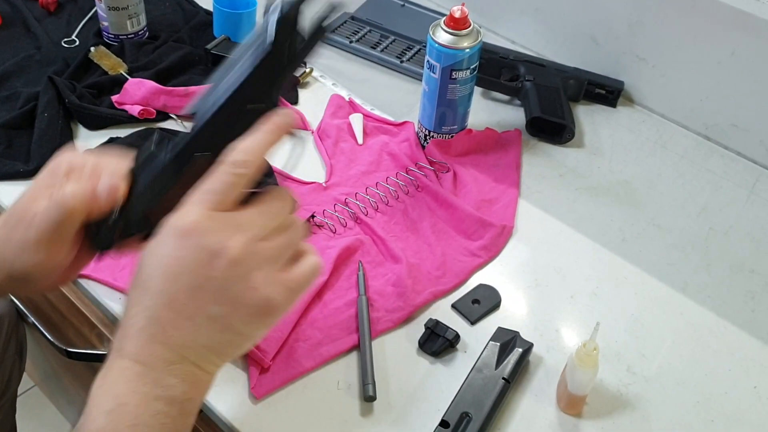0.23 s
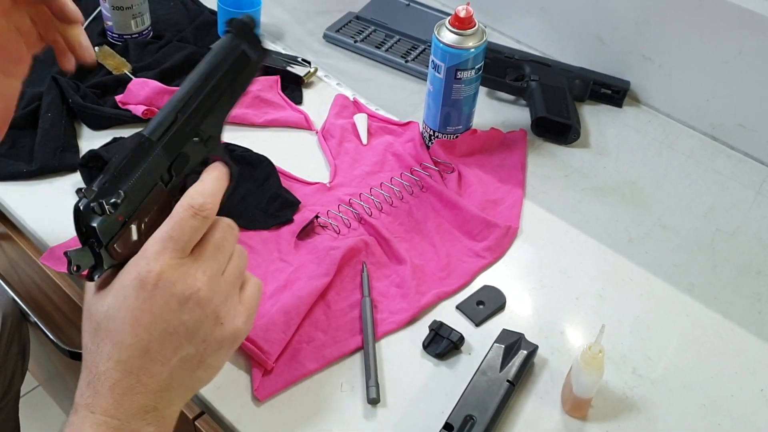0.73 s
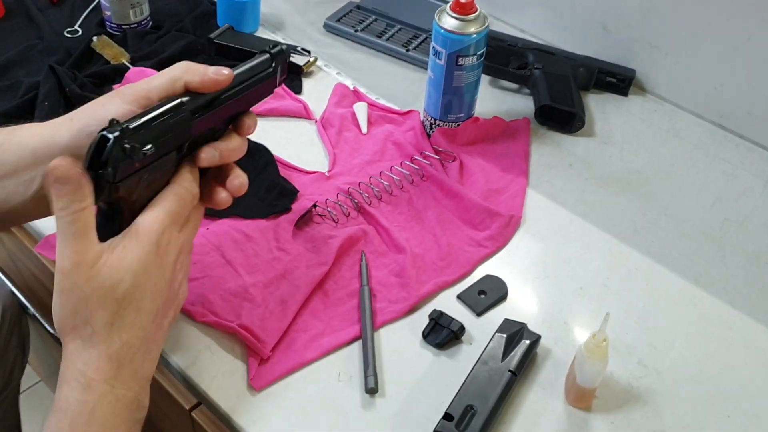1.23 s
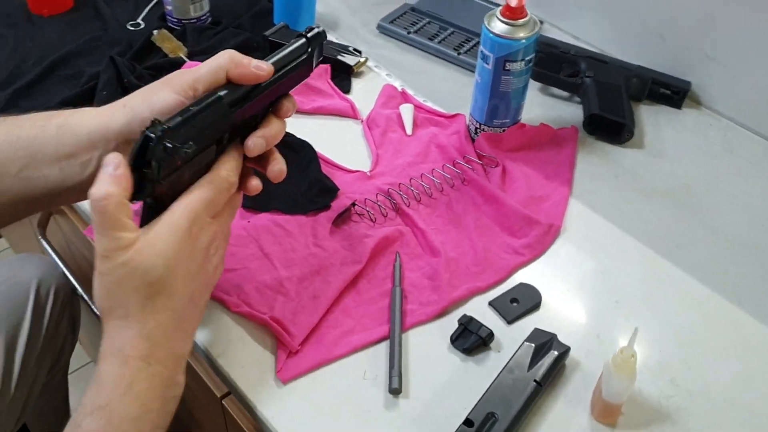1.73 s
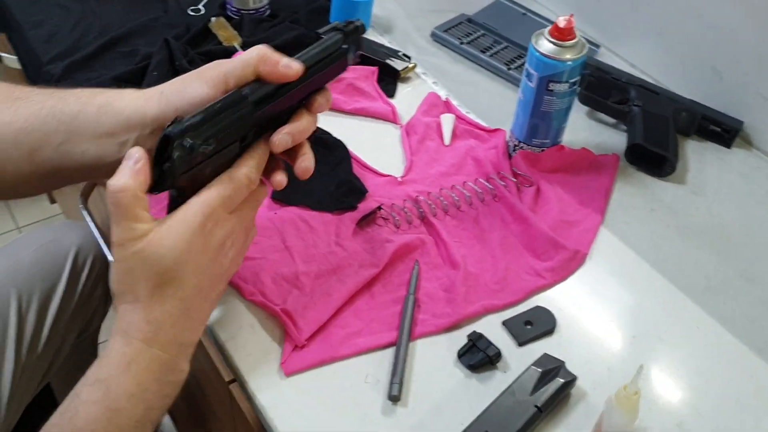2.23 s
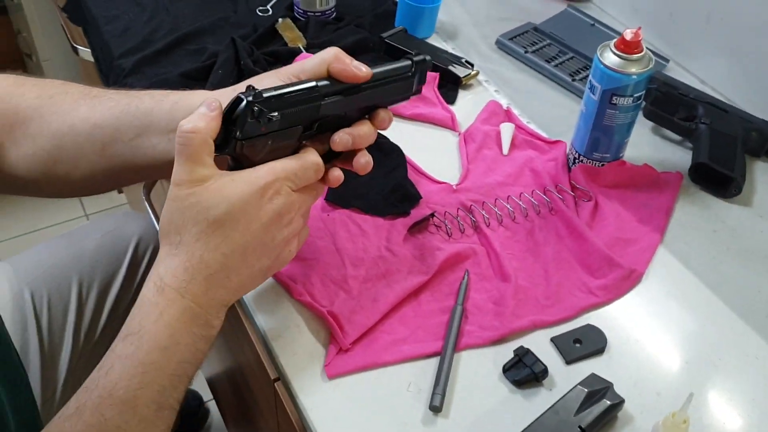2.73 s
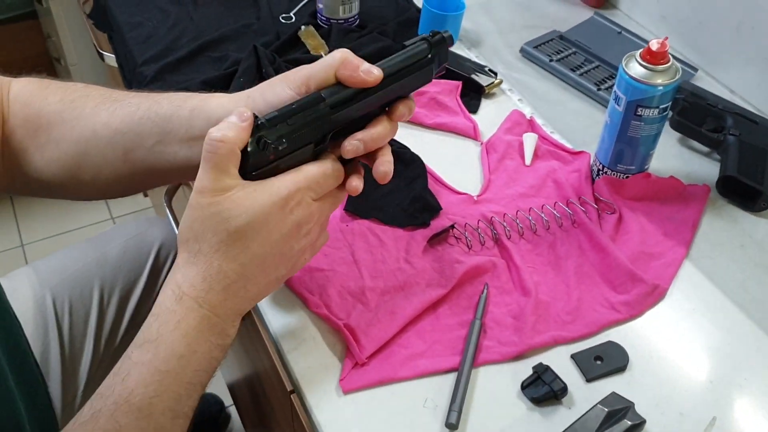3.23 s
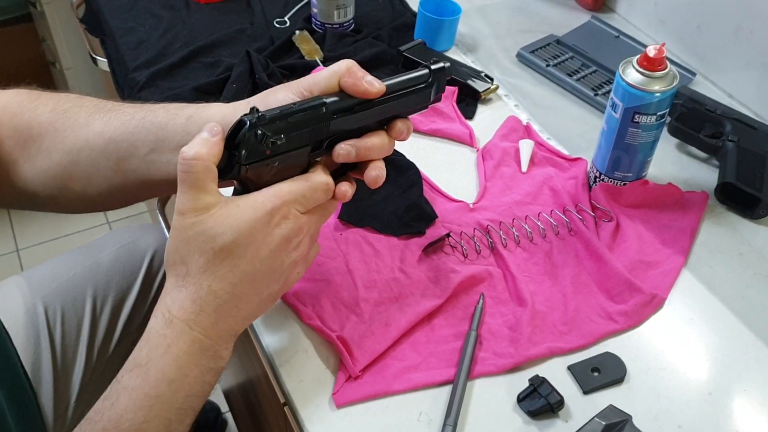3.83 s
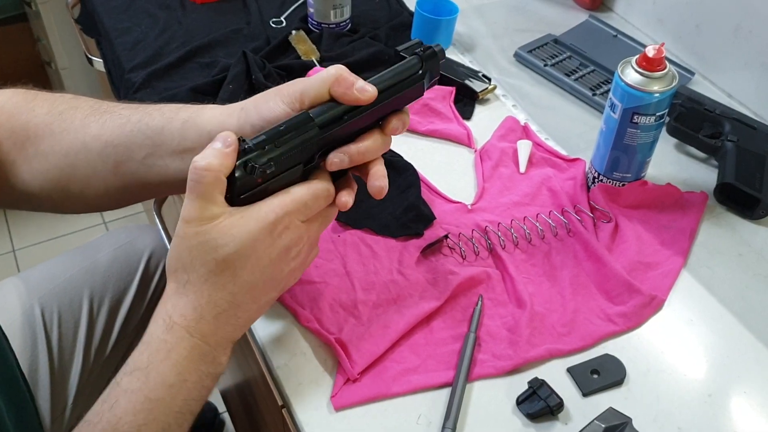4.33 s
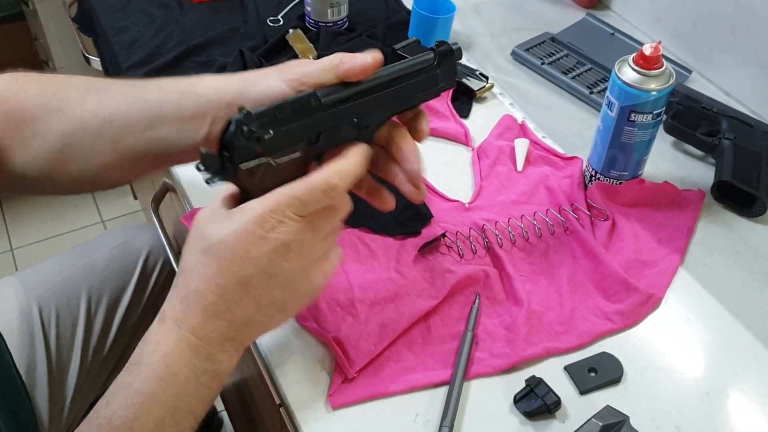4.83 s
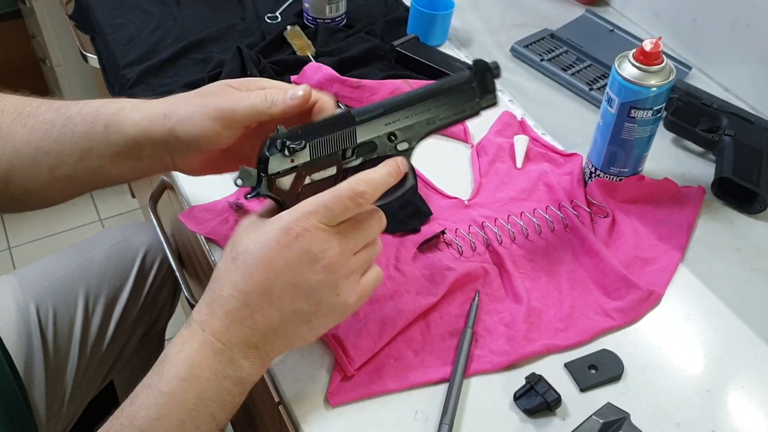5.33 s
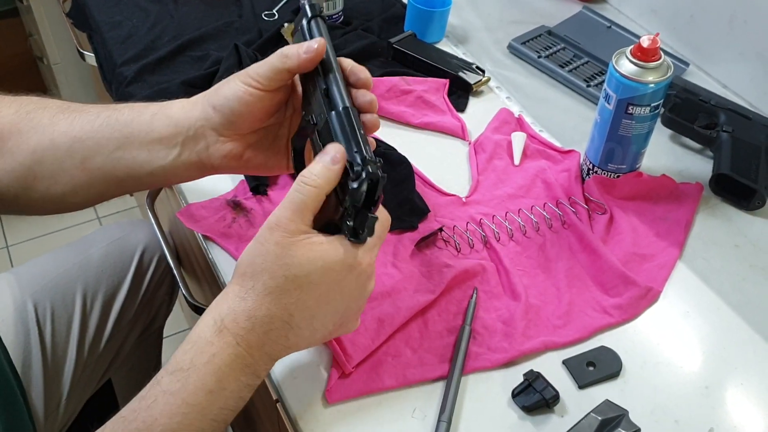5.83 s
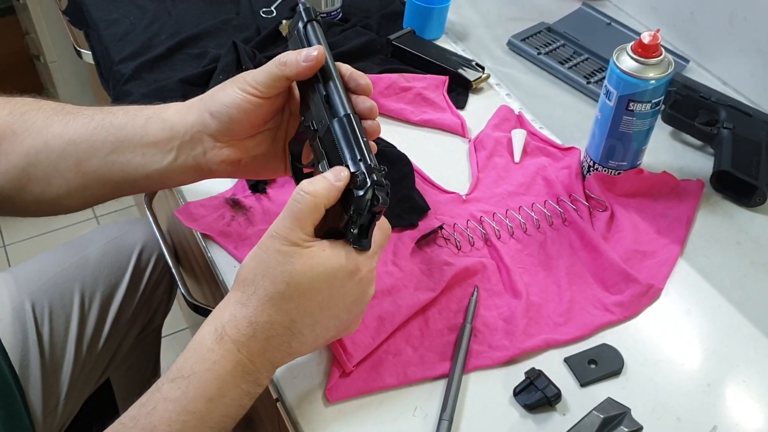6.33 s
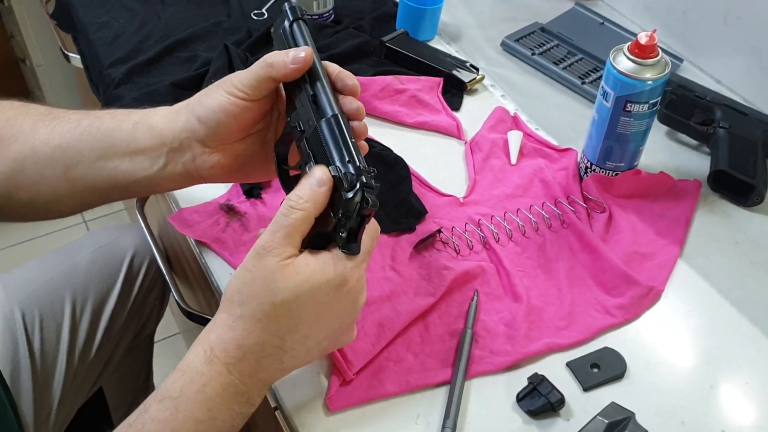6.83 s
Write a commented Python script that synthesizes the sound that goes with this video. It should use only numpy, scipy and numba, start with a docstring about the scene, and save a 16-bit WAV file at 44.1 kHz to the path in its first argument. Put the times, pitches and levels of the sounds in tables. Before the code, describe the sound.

Close to a stereo microphone in a small hard room, a pistol slide is racked quickly several times with loud, bright steel clacks. After a short gap, a thumb flicks the safety lever back and forth in small clusters of clicks, growing firmer. Late on, the hammer snaps down hard and rings briefly, followed by a quieter click. Low hum and soft air noise lie beneath.

```python
"""In a small, hard room, a pistol is worked by hand close to a stereo microphone.
The slide is racked back and forth, the thumb flicks the safety lever to and fro, and the hammer snaps down.
Contacts are shaped noise, ringing steel is decaying sines, jolts are falling pulses, loose parts tick and ping.
The room answers with a diffuse tail over noise and a low hum; a fast limiter flattens the hardest blows."""
import sys
import numpy as np
from scipy import signal
from scipy.fft import rfft, irfft
from scipy.io import wavfile
from scipy.ndimage import uniform_filter1d, minimum_filter1d
from numba import njit

SR = 44100
rng = np.random.default_rng(int(sys.argv[2]) if len(sys.argv) > 2 else 0)


def file_out(sig):
    """Save sig as 16-bit WAV at sys.argv[1]."""
    # one column per channel
    cols = np.atleast_2d(sig).T
    # limit, then scale
    lim = np.clip(cols, -1, 1)
    pcm = np.round(lim * 32767).astype(np.int16)
    wavfile.write(sys.argv[1], SR, pcm)


N = 312704
LEAD = SR // 4  # samples of run-up before time zero


def undb(db):
    """Decibel law: 20 dB is a factor of ten in amplitude."""
    return 10 ** (np.asarray(db) / 20)


def unit(x):
    """Power normalisation: scale each channel to rms 1."""
    return x / np.sqrt(np.mean(x ** 2, axis=-1, keepdims=True))


def along(hz, points):
    """Logarithmic pitch scale: read (Hz, value) points on a log-frequency axis."""
    f, value = np.transpose(points)
    return np.interp(np.log(np.maximum(hz, 1)), np.log(f), value)


def colour(x, *spectra):
    """Linear filtering: responses in series add in dB, here as (Hz, dB) spectra."""
    hz = np.fft.rfftfreq(x.shape[-1], 1 / SR)
    response_db = sum(along(hz, s) for s in spectra)
    return irfft(rfft(x) * undb(response_db), x.shape[-1])


def fade(t, t60):
    """Exponential decay: the level falls 60 dB in t60 seconds."""
    return np.exp(-np.log(1000) * t / t60)


def empty_tracks():
    """Superposition starts from silence: two direct channels and four directions towards the walls."""
    return np.zeros((2, LEAD + N)), np.zeros((4, LEAD + N))


def add(track, s, sound):
    """Superposition: sum a sound into a track at s seconds."""
    i = max(LEAD + int(s * SR), 0)
    part = sound[..., :max(track.shape[1] - i, 0)]
    track[:, i:i + part.shape[-1]] += part


# Spectral shape of the background air. Each row: frequency in Hz, relative density in dB per Hz.
AIR_SPECTRUM = [(15, -51), (25, -25), (69, -4), (198, -8), (253, 0.5), (399, -14.5), (469, -11),
                (762, -15.5), (895, -20.5), (2420, -24), (3440, -29), (6380, -32.5), (8350, -44),
                (13900, -47), (15500, -63.5)]
# Swell of the background air. Each row: time in seconds, level in dB before gain_db.
AIR_LEVEL = [(0.9, -61.5), (1.69, -61.5), (2.14, -57), (2.73, -58.5), (3.24, -51), (3.93, -49),
             (5.92, -49.5), (6.19, -55.5), (7.09, -57)]
# Hum in the air. Each row: centre frequency in Hz, level in dB before the gains in air().
HUM = [(77, -58), (260, -56), (301, -56.5)]


def air(gain_db=2, hum_db=-1, hum_width_hz=9):
    """Mid-side noise: rumble, hiss and a wavering narrow-band hum share one level; the bass is nearly mono."""
    mid = unit(colour(rng.standard_normal(N), AIR_SPECTRUM))
    side = unit(colour(rng.standard_normal(N), AIR_SPECTRUM))
    side = colour(side, [(30, -6.5), (100, -18.0), (280, -13), (550, -5.5), (1100, 0.5)])
    for hz, db in HUM:
        line = [(hz - 3 * hum_width_hz, -90), (hz - hum_width_hz, -10), (hz, 0),
                (hz + hum_width_hz, -10), (hz + 3 * hum_width_hz, -90)]
        hum = unit(colour(rng.standard_normal(N), line))
        mid = mid + undb(db + hum_db + 44.5) * hum
    level_db = np.interp(np.arange(N) / SR, *np.transpose(AIR_LEVEL))
    return (mid + side * np.array([[1], [-1]])) * undb(level_db + gain_db)


# Colour of the room's answer. Each row: frequency in Hz, relative level in dB.
ROOM_COLOUR = [(200, -1), (1000, 4), (2500, 3.5), (4000, 1.5), (6500, 1), (8200, 0), (11000, -1),
               (15500, -2.5)]
# Reverberation time of the room. Each row: frequency in Hz, t60 in seconds.
ROOM_T60 = [(300, 0.3), (2500, 0.61), (6000, 0.55), (9000, 0.41), (15000, 0.33)]


def room(directions, wet_db=-4, build_s=0.00067):
    """Diffuse reverberation: a noise tail per direction; middle pitches last longest, bass and treble die sooner."""
    t = np.arange(SR) / SR
    hz = np.fft.rfftfreq(SR, 1 / SR)
    edges = np.geomspace(120, 18000, 13)
    out = 0
    for x in directions:
        noise = rfft(colour(rng.standard_normal((2, SR)), ROOM_COLOUR))
        tail = 0
        for lo, hi in zip(edges, edges[1:]):
            band = irfft(noise * (hz >= lo) * (hz < hi), SR)
            tail = tail + band * fade(t, along(np.sqrt(lo * hi), ROOM_T60))
        response = unit(tail * (1 - np.exp(-t / build_s))) / np.sqrt(SR * len(directions))
        out = out + signal.fftconvolve(x[None], response, axes=1)[:, :len(x)]
    return undb(wet_db) * out


def ring(modes, t, detune):
    """Modal vibration: decaying sines, randomly detuned at every strike, with their own phase at each port."""
    hz, db, t60 = np.transpose(modes)[:, :, None]
    hz = hz * (1 + detune * rng.standard_normal(hz.shape))
    phase = rng.uniform(0, 2 * np.pi, (2, len(modes), 1))
    return np.sum(undb(db) * fade(t, t60) * np.sin(2 * np.pi * hz * t + phase), axis=1)


# Spectrum of steel meeting steel. Each row: frequency in Hz, relative level in dB.
CONTACT = [(200, -17.5), (650, -21), (1100, -11), (1700, -10), (2400, -0.5), (3300, -2.5), (4400, 1.5),
           (6400, 2.5), (8000, -5), (11000, 2), (13000, -0.5), (15500, 1.5)]


def chatter(t, t60, rise_s, *spectra, channels=2):
    """Contact noise: countless tiny impacts as two parts settle against each other."""
    grit = unit(colour(rng.standard_normal((channels, len(t))), CONTACT, *spectra))
    shape = (1 - np.exp(-t / rise_s)) * fade(t, t60)
    return unit(grit * shape) * np.sqrt(np.mean(shape ** 2))


def radiate(hit, *spectra):
    """Sound radiation: a hit's energy leaves in four directions, each with its own fine grain."""
    t = np.arange(hit.shape[1]) / SR
    return unit(chatter(t, 0.022, 0.0011, *spectra, channels=4)) * hit.std()


# Small parts that the fingers leave free. Each row: start in seconds, pitch in Hz, level in dB, t60 in seconds.
PINGS = [(1.4966, 3350, -30, 0.036), (1.4966, 4740, -22, 0.029), (2.0057, 3500, -27, 0.033),
         (4.2534, 5010, -21.5, .04), (6.7264, 3530, -44, .38)]


def pings(rise_s=0.00043, room_db=-9):
    """Single-mode resonance: clear notes of small steel parts; returns direct sound and what reaches the walls."""
    direct, sent = empty_tracks()
    t = np.arange(SR // 2) / SR
    for s, *mode in PINGS:
        note = ring([mode], t, detune=0) * (1 - np.exp(-t / rise_s))
        add(direct, s, note)
        add(sent, s, undb(room_db) * np.tile(note, (2, 1)))
    return direct, sent


# Thumb pushes the lever over three detents.
# Each row: first, second and third click in seconds, effort in dB.
PUSHES = [(1.6755, 1.7175, 1.7684, -11.5), (2.1964, 2.239, 2.315, -9), (3.4147, 3.4336, 3.4748, 0),
          (4.4649, 4.505, 4.5521, 0)]
# Thumb flicks the lever back. Each row: first, second and third click in seconds, effort in dB.
RETURNS = [(1.9168, 1.9724, 2.0057, -7.5), (2.9792, 3.12, 3.1471, 0), (4.0948, 4.2047, 4.2534, -1)]
# The three clicks of a push, then of a return. Each row: relative level in dB at full effort,
# body in dB near 4 kHz, treble in dB, left minus right in dB, room in dB.
PUSH_CLICKS = [(-3, -16, -13, 2.5, -0.5), (-7, -9, -18, 2, -3.5), (-5, -13.5, -15.5, 3.5, 1)]
RETURN_CLICKS = [(-7, -12.5, -13.5, 2.5, -1), (-6, -13, -15, -.5, -2.5), (-.5, -14, -13.5, 1, -2)]
# The lever seating at the end of a push, in the same columns.
SEAT_CLICK = (-2.5, -6.5, -21, 2.5, -3)
# Loose parts tick as the grip eases. Each row: start in seconds, relative level in dB.
TICKS = [(1.3815, -39), (1.4032, -27), (1.747, -31), (2.4402, -22.5), (2.518, -36), (3.0934, -29),
         (3.6128, -13.5), (4.4307, -27.5), (4.6795, -7.5), (7.0726, -35)]
# Tone of every tick: body in dB, treble in dB, left minus right in dB, room in dB.
TICK_TONE = (-11.5, -15.5, 1, -3)


def flicking(seat_delay_s=.0035, seat_slope=1.3):
    """Detent mechanics: strokes repeat their clicks, scaled by effort; a gentle push seats far more softly."""
    clicks = [(s, db, *TICK_TONE) for s, db in TICKS]
    for strokes, sounds in ((PUSHES, PUSH_CLICKS), (RETURNS, RETURN_CLICKS)):
        for *times, effort_db in strokes:
            clicks += [(s, effort_db + db, *tone) for s, (db, *tone) in zip(times, sounds)]
    seat_db, *seat_tone = SEAT_CLICK
    for _, _, s, effort_db in PUSHES:
        clicks.append((s + seat_delay_s, seat_slope * effort_db + seat_db, *seat_tone))
    return clicks


# Short modes of the hand-held frame.
# Each row: nominal frequency in Hz, relative level in dB before the click's tone, t60 in seconds.
FRAME = [(1578, -13, 0.038), (2127, -5.5, 0.029), (3498, -1, 0.021), (4477, 0, 0.016), (5330, -16.5, 0.016),
         (6580, 1, 0.02), (10620, 0, 0.016), (13580, -10, 0.0095)]


def lever(gain_db=-21, mid_db=-13, frame_db=-12, scrape_db=-19, send_db=-5, t60=0.016, lag_s=.0003, wall_db=-21):
    """Friction, then impact: the lever scrapes over its detent and drops in; returns direct and wall sound."""
    direct, sent = empty_tracks()
    t = np.arange(SR // 20) / SR
    for s, db, body_db, treble_db, pan_db, room_db in flicking():
        tone = [(2200, mid_db - 6.5), (3900, body_db), (6300, mid_db), (10500, treble_db)]
        modes = [(hz, mode_db + along(hz, tone) - mid_db, decay) for hz, mode_db, decay in FRAME]
        frame = undb(frame_db) * ring(modes, t, detune=0.042) * (1 - np.exp(-t / 0.00027))
        click = chatter(t, t60, .0003, tone) + frame
        size = undb(db + gain_db) / click.std()
        click = size * click * undb(np.array([[pan_db], [-pan_db]]) / 2)
        # the right port is further away
        click[1] = np.interp(t - round(lag_s * SR) / SR, t, click[1], left=0)
        scrape = undb(db + scrape_db) * chatter(t, 0.0069, 0.00092, tone)
        add(direct, s, click)
        add(direct, s - .0016, scrape)
        # the nearest wall answers first, with the sides swapped
        add(direct, s + rng.uniform(0.01, 0.016), undb(wall_db) * click[::-1])
        walls = radiate(click, tone) + size * np.tile(frame, (2, 1))
        add(sent, s, undb(room_db + send_db) * walls)
    return direct, sent


def thump(t, start_hz=420, end_hz=52, drop_s=0.0017, t60=0.12, skew=.7, tap_db=15, tap_s=0.000093):
    """Jolt of the whole gun: a tap and a dull pulse that drops in pitch, out of step between the ports."""
    settled = 1 - np.exp(-t / drop_s)
    turns = end_hz * t + start_hz * drop_s * settled  # start_hz is the extra pitch that dies away
    phase = np.array([[skew], [-skew]]) * settled
    pulse = np.sin(2 * np.pi * turns + phase) * fade(t, t60)
    tap = undb(tap_db) * np.exp(-t / tap_s)
    return -pulse - tap


def rattle(x, depth_db=3, step_s=.0012):
    """Repeated impact: loose parts bounce, so the same energy arrives in uneven spurts."""
    steps = np.arange(x.shape[1]) / (SR * step_s)
    spurts = rng.standard_normal(size=200)
    y = x * undb(depth_db * np.interp(steps, np.arange(len(spurts)), spurts))
    return y * x.std() / y.std()


def blows(table, body, modes, ring_db, ring_slope):
    """Impact excitation: each blow is chatter, a steel ring and a thump; returns direct and wall sound."""
    direct, sent = empty_tracks()
    t, short = np.arange(SR // 2) / SR, np.arange(SR // 20) / SR
    for s, db, treble_db, t60, thump_db, room_db in table:
        tone = [(5000, 0.004), (10000, treble_db)]
        crack = undb(db) * rattle(chatter(short, t60, 0.00029, body, tone))
        steel = undb(ring_db + ring_slope * db) * ring(modes, t, detune=.003)  # a harder blow rings louder
        for part in (crack, steel, undb(thump_db) * thump(t)):
            add(direct, s, part)
        add(sent, s, undb(room_db) * radiate(crack, body, tone))
        add(sent, s, undb(room_db) * np.tile(steel, (2, 1)))
    return direct, sent


# Hammer and trigger. Each row: start in seconds, force in dB, treble in dB, chatter t60 in seconds,
# thump in dB, room in dB.
HAMMER = [(1.4966, -18, 1.5, 0.025, -46, -5.5), (6.068, -25, -3, 0.033, -71.5, 1.5),
          (6.0744, 3, 4, 0.015, -19, 0.5), (6.7248, -21.5, -2.5, 0.018, -65, -5),
          (6.7264, -14.5, 4.5, .024, -40, -6.5)]
# The small hammer's body. Each row: frequency in Hz, relative level in dB.
HAMMER_BODY = [(400, -1), (1500, -4), (2300, 0.5), (3400, 1.5), (5000, 0)]
# The hammer's spring. Each row: nominal frequency in Hz, relative level in dB, t60 in seconds.
SPRING = [(2203, -2, .2), (3300, -1, 0.22), (3560, -2, 0.53), (4100, -4, .15), (5130, 0, 0.18),
          (11200, 4, .2), (11800, -1, .2)]


def hammer():
    """Stored spring energy: the hammer's blows set its spring ringing."""
    return blows(HAMMER, HAMMER_BODY, SPRING, ring_db=-44.5, ring_slope=0.73)


def rebounding(table, count, gap_s, loss_db, treble_db, dull_db, t60, thump_db, room_db):
    """Restitution: a blow and its ever duller rebounds; only the blow itself jolts the gun."""
    contacts = []
    for s, db, rebound_db in table:
        contacts.append((s, db, treble_db, t60, db + thump_db, room_db))
        for k in range(count):
            force_db = db + rebound_db - k * loss_db
            dulled_db = treble_db - (k + 1) * dull_db
            contacts.append((s + (k + 1) * gap_s, force_db, dulled_db, t60, -np.inf, room_db))
    return contacts


# The slide hits its rear stop and rebounds once.
# Each row: start in seconds, force in dB, rebound in dB relative to the blow.
PULLS = [(.1249, -6, -4), (.2988, -4.5, -5.5), (.4674, -3.5, -8)]
# Let go, the slide clacks on its way forward. Each row: start in seconds, force in dB.
RELEASES = [(0.1603, -2.5), (0.3453, -17.5), (.4988, -4.5)]
# The slide slams shut and rebounds twice.
# Each row: start in seconds, force in dB, first rebound in dB relative to the blow.
SLAMS = [(-.055, -0.5, -12), (.0584, 1, -10), (.2279, -2.5, -5.5), (0.3956, -5, 1.5), (0.5773, -.5, -6.5)]


def racking(brush_s=.01, brush_db=-23, brush_t60=.022,
            clack_treble_db=-4.0, clack_t60=0.021, clack_thump_db=-45, clack_room_db=-5):
    """Reciprocating motion: rear stop, release clack, light brush and slam, in the columns of the hammer."""
    pulls = rebounding(PULLS, count=1, gap_s=.0123, loss_db=0, treble_db=4.5, dull_db=5.0,
                       t60=.012, thump_db=-34.5, room_db=-7.5)
    clacks = [(s, db, clack_treble_db, clack_t60, db + clack_thump_db, clack_room_db) for s, db in RELEASES]
    brushes = [(s - brush_s, brush_db, 0, brush_t60, -np.inf, 0) for s, _, _ in SLAMS]
    slams = rebounding(SLAMS, count=2, gap_s=.007, loss_db=5.5, treble_db=3, dull_db=4.5,
                       t60=0.025, thump_db=-33.5, room_db=-2)
    return pulls + clacks + brushes + slams


# The heavy slide's fuller body. Each row: frequency in Hz, relative level in dB.
SLIDE_BODY = [(450, 2.5), (1000, 4.5), (2500, 2.5), (3400, 1.5), (5000, -2.5), (6300, -1)]
# Long modes of slide and barrel. Each row: nominal frequency in Hz, relative level in dB, t60 in seconds.
STEEL = [(1840, -9, 0.23), (2125, -8, 0.43), (2340, -9.5, 0.28), (2540, -4, 0.32), (2515, -2.5, .35),
         (2800, -10, 0.21), (2915, -10, 0.22), (4398, 2.5, .36), (4460, 0.5, 0.5), (4640, -1, .5),
         (5800, -1, 0.31), (5750, -1, 0.29), (5970, 0.5, 0.3), (7270, -6, .18), (8780, -2.5, 0.44),
         (8950, -5, 0.32), (10500, -4, .22), (11100, 1, 0.16), (11480, -0.5, 0.19), (14100, 7.5, 0.0976)]


def slide():
    """Struck-metal resonance: the racked slide sets its own steel and the barrel ringing."""
    return blows(racking(), SLIDE_BODY, STEEL, ring_db=-35.5, ring_slope=0.92)


# The two microphone ports. Each row: frequency in Hz, left minus right in dB.
PORTS = [(200, 2), (2400, 0), (4400, -2.5), (6200, -1.5), (8000, 5), (10000, 4.5), (12500, 1), (15500, -4)]


def scene():
    """Direct plus reverberant field: slide, hammer, lever and pings in the room, as the two ports hear them."""
    direct, sent = zip(slide(), hammer(), lever(), pings())
    gun = sum(direct) + room(sum(sent))
    left = colour(gun[0], [(hz, db / 2) for hz, db in PORTS])
    right = colour(gun[1], [(hz, -db / 2) for hz, db in PORTS])
    background = air() * undb(np.array([[.8], [-.8]]))  # left gain +0.8 dB, right gain -0.8 dB
    return np.array([left, right])[:, LEAD:] + background


@njit
def follow(x, release):
    """Peak detection: jumps up at once and sinks exponentially."""
    out, e = np.empty(len(x)), 0.
    for i in range(len(x)):
        e = max(x[i], e * release)
        out[i] = e
    return out


def record(dry, ceiling_db=0.0, release_s=0.0026, top_hz=15800):
    """Gain reduction and band limiting: a fast look-ahead limiter, then a steep low-pass."""
    peak = follow(np.abs(dry).max(axis=0) + 1e-9, np.exp(-1 / (release_s * SR)))
    needed = np.minimum(1, undb(ceiling_db) / peak)
    gain = uniform_filter1d(minimum_filter1d(needed, size=45), size=45)  # centred windows look ahead
    low_pass = signal.ellip(8, .2, 70, top_hz, fs=SR, output="sos")
    return signal.sosfilt(low_pass, dry * gain)


dry = scene()
out = record(dry)
file_out(out)
```